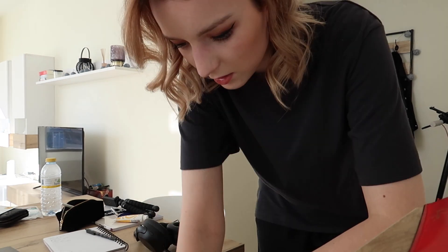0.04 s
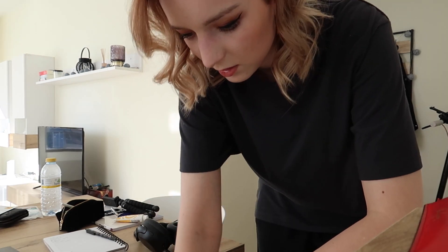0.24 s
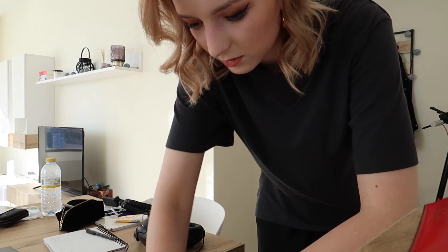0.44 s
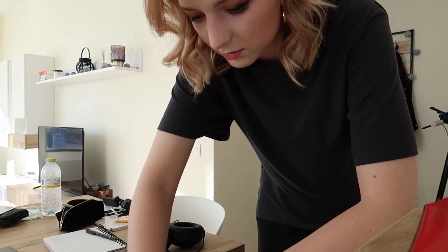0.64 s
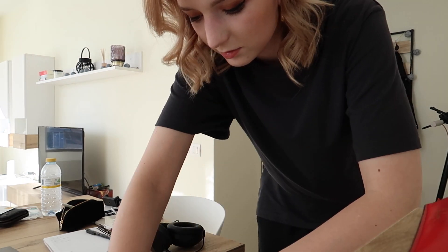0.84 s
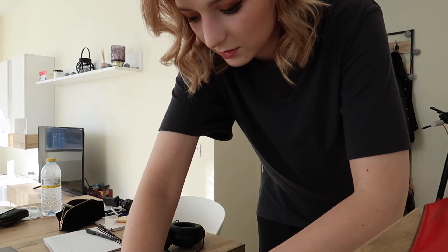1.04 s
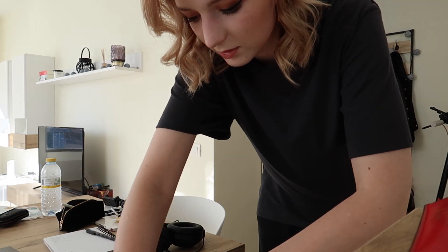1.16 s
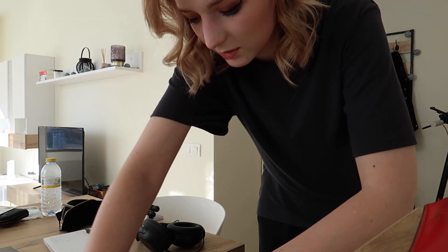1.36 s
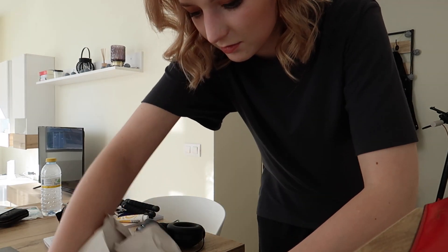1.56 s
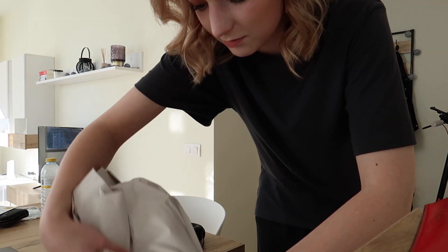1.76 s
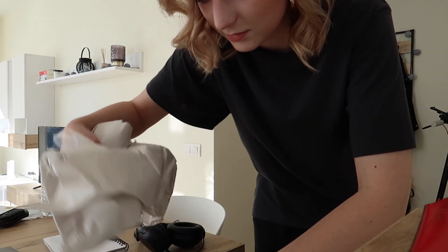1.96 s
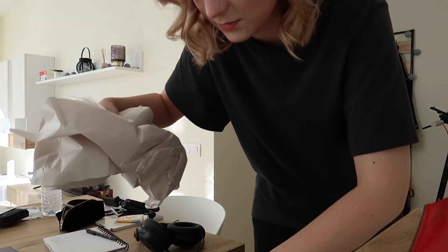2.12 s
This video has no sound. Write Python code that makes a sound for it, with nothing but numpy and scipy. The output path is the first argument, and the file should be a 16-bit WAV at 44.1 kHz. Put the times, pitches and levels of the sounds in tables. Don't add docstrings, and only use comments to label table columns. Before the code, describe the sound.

Packing paper crumples, close and crisp, in a small quiet room. A faint rustle starts, then from about 0.2 s creases crackle in clumps with dull low knocks on the bag wall. It thins near 1 s; a hard bright snap hits at 1.05 s with brief crackle. Denser, sharper crumpling returns from 1.2 to 1.8 s, then fades to sparse ticks and a last fold near 2.2 s over faint air hiss.

```python
import sys
import numpy as np
from scipy import signal
from scipy.io import wavfile

SR = 44100
rng = np.random.default_rng(int(sys.argv[2]) if len(sys.argv) > 2 else 0)


def invert_db(x):
    u = np.asarray(x, float) / 20
    return 10 ** u


def wav_out(sig):
    wavfile.write(sys.argv[1], SR, np.round(np.clip(np.atleast_2d(sig).T, -1, 1) * 32767).astype(np.int16))


N = 96534


def evened(x):
    return x / np.sqrt(np.mean(x ** 2) + 1e-20)


def read(points, hz):
    f, value = np.transpose(points)
    return np.interp(np.log(hz + 1), np.log(f + 1), value)


def add(mix, s, sound):
    part = mix[round(s * SR):][:len(sound)]
    part += sound[:len(part)]


def highpass(x, order, hz):
    return signal.sosfilt(signal.butter(order, hz, "high", fs=SR, output="sos"), x)


def colour(x, points):
    log_gain = np.log(invert_db(read(points, abs(np.fft.fftfreq(4096, 1 / SR)))))
    taps = np.fft.ifft(np.exp(np.conj(signal.hilbert(log_gain)))).real
    return signal.oaconvolve(x, taps[:2048])[:len(x)]


def ring(x, hz, width):
    r = np.exp(-np.pi * width / SR)
    turn = 2 * np.pi * hz / SR
    return signal.lfilter([0, r * np.sin(turn)], [1, -2 * r * np.cos(turn), r * r], x)


def knock(x, hz, width):
    return ring(ring(x, hz, width), hz, width) * 2 * np.e * np.pi * width / SR


def clicks(per_s, size_db, count):
    hit, big, sign = rng.random((count, 3)).T
    size = invert_db(size_db * np.minimum(-np.log(big + 1e-9), 4.0))
    return (hit < per_s / SR) * np.sign(sign - .5) * size


# time in seconds, effort in dB, brightness in dB per octave,
# contact with the bag in dB.
PULL = [(0, -32, -1, -6), (0.069, -36.5, -2.5, -9), (.15, -33, -5.5, -2.5), (.25, -25, -2.5, -19),
        (.37, -29, -2, -13), (.47, -27, -1.55, -13), (.69, -24.5, -0.5, -4.5), (.75, -30.5, 0.1, -1.5),
        (.95, -30.5, -0.5, -7.5), (1.15, -31.5, 0.5, -11), (1.355, -30, -0.5, -10),
        (1.375, -27, -0.3, -12.5), (1.52, -25.5, -0.2, 0), (1.619, -24.5, 2, -7), (1.742, -31, -2.5, -10),
        (1.841, -29.5, 2.5, -10), (1.949, -37, .5, -9), (2.12, -43.5, -2, -2)]


def pull(column):
    rows = np.array(PULL)
    return np.interp(np.arange(N) / SR, rows[:, 0], rows[:, column])


def clumps():
    clump_db, clump_s = 1.5, 0.023
    window = np.hanning(400) ** (1 / (clump_s * SR / 200) ** 2)
    lumps = signal.oaconvolve(rng.standard_normal(N), window, "same")
    return invert_db(clump_db * evened(lumps))


# frequency in Hz, level in dB.
PAPER_COLOUR = [(300, -2.5), (600, -2), (1400, 1), (2500, 2.5), (4100, -5), (8000, -21.5), (11000, -29),
                (14500, -33.5)]


def creases():
    creases_per_s, size_db, slide_db, turns = 3500, 1.5, -2, 3.32
    facets = np.geomspace(420, 15000, num=24)
    train = clicks(creases_per_s, size_db, count=N)
    which = rng.integers(0, len(facets), N)
    slide = invert_db(slide_db) * rng.standard_normal((N, len(facets))).T
    tilt = np.clip(pull(2), -3, 3)
    out = np.zeros(N)
    for k, hz in enumerate(facets):
        drive = evened(train * (which == k)) + slide[k]
        level = invert_db(read(PAPER_COLOUR, hz) + tilt * np.log2(hz / 2000))
        out += np.sqrt(hz) * level * evened(knock(drive, hz, hz / turns))
    return invert_db(pull(1)) * clumps() * evened(out)


def sheet(x):
    unit = abs(colour(np.eye(1, 2048)[0], PAPER_COLOUR)).max()
    return colour(highpass(x, 2, 320), PAPER_COLOUR) / unit


# start in seconds, peak in dB, pitch in
# Hz, length in seconds.
FOLDS = [(0.147, -23, 3280, 0.023), (0.164, -20, 1390, 0.051), (0.214, -20, 1510, 0.0041),
         (0.257, -17, 1550, 0.012), (0.299, -19.5, 1900, 0.011), (0.43, -23, 1520, 0.018),
         (0.47, -21, 1520, 0.0072), (0.582, -25, 3000, 0.0095), (0.693, -14, 2370, 0.0083),
         (0.713, -16.5, 2220, 0.0085), (0.781, -17, 2200, 0.0067), (0.782, -11.5, 2280, 0.012),
         (0.822, -16.5, 2400, 0.019), (0.857, -12, 2450, 0.021), (0.865, -19, 2680, 0.013),
         (1.19, -24, 1460, 0.01), (1.263, -15.5, 2210, 0.016), (1.349, -28, 1980, 0.0042),
         (1.372, -9.5, 2380, 0.016), (1.422, -13, 1740, 0.028), (1.477, -17, 2450, 0.016),
         (1.558, -20, 1370, 0.0021), (1.563, -4.5, 2600, 0.0026), (1.612, -11, 1500, 0.021),
         (1.645, -25, 1480, 0.01), (1.683, -16, 2390, 0.011), (1.795, -10.5, 3520, 0.0031),
         (1.822, -16, 2900, 0.016), (2.1366, -30, 1870, 0.0035), (2.163, -18.5, 3020, 0.0056),
         (2.1873, -7.5, 2800, 0.0019)]


def folds():
    fold_db, wide_db, turns, rise_s = -11, 17, 5.1, .002
    facet, wide, t = np.zeros(N), np.zeros(N), np.arange(2500) / SR
    for s, db, hz, length in FOLDS:
        volley = clicks(3500, 1.3, count=len(t)) * np.minimum(t / rise_s + 0.12, 1)
        volley[4] = 0.45
        volley = invert_db(db + fold_db) * volley * np.exp(-(t / max(length, .001)) ** 2) / 4.2
        add(facet, s, knock(volley, hz, hz / turns))
        add(wide, s, volley)
    return facet + invert_db(wide_db) * sheet(wide)


# start in seconds, peak in dB, pitch in Hz.
TICKS = [(0.0204, -22.5, 2460), (0.0984, -17, 3000), (0.1223, -25, 1530), (0.1263, -33, 1570),
         (0.1368, -18, 2180), (0.1497, -14.5, 3140), (0.1675, -20, 2950), (0.184, -8, 2020),
         (0.1935, -15, 2400), (0.2195, -15, 1590), (0.2343, -12, 1790), (0.2583, -11, 1320),
         (0.2627, -6, 1420), (0.2969, -17, 2000), (0.3133, -6.5, 2350), (0.3234, -12, 1420),
         (0.3421, -29, 2370), (0.4105, -14, 1490), (0.4224, -13, 1690), (0.4343, -12, 3270),
         (0.4402, -9.5, 1500), (0.4543, -10, 2580), (0.4739, -14, 1550), (0.4818, -15, 1480),
         (0.4925, -11, 2180), (0.5168, -20, 1530), (0.5231, -19, 2110), (0.5427, -14, 2120),
         (0.5476, -14, 2160), (0.561, -28, 2240), (0.578, -20, 1435), (0.5834, -8, 880),
         (0.6272, -19, 1510), (0.6418, -11, 1780), (0.6851, -22, 3280), (0.7192, -16, 2090),
         (0.7408, -12, 2370), (0.7498, -18, 1490), (0.7752, -23, 2310), (0.7808, -14, 1610),
         (0.7856, -12, 2370), (0.7911, -18, 1960), (0.8144, -12, 1380), (0.8263, -12, 3640),
         (0.8316, -19, 2200), (0.8537, -12, 2450), (0.8604, -5.5, 1480), (0.8654, -18, 2130),
         (0.8889, -10, 2550), (0.9132, -6.5, 2120), (0.9211, -15, 2030), (0.9262, -29, 1720),
         (0.9602, -25, 1560), (0.9716, -6, 2530), (0.984, -12, 1740), (1.0166, -17, 1370),
         (1.0332, -12, 1750), (1.0408, -30, 1560),
         (1.1068, -15, 3480), (1.1151, -18, 4170), (1.1792, -25, 2770), (1.2013, -8.5, 1490),
              (1.2071, -15, 1310), (1.213, -19, 1480), (1.228, -18, 2130), (1.2406, -7, 2650),
              (1.2486, -21, 2370), (1.2652, -17.5, 1320), (1.2688, -13, 2690), (1.2738, -13, 2060),
              (1.2767, -15.5, 2560), (1.31, -18, 2280), (1.3173, -15, 2310), (1.341, -11, 3300),
              (1.371, -4.5, 3150), (1.3793, -11, 1470), (1.4284, -0.5, 2170), (1.436, -15, 2480),
              (1.4542, -16, 1870), (1.4777, -10, 1920), (1.4843, -13, 2200), (1.487, -10, 2300),
              (1.4992, -10, 990), (1.5142, -23, 1580), (1.5338, -18, 1500), (1.5388, -19, 2520),
              (1.55, -9, 1470), (1.5557, -14, 2070), (1.5628, -6, 1400), (1.571, -19, 2860),
              (1.6118, -4.5, 1310), (1.6175, -11, 1260), (1.6254, -2.5, 2420), (1.6516, -11, 1410),
              (1.678, -7, 2460), (1.6871, -21, 2250), (1.717, -5.5, 2340), (1.765, -17, 2150),
              (1.7925, -20, 2540), (1.8147, -18, 3340), (1.8222, -12, 1580), (1.8285, -9.5, 3530),
              (1.8357, -29, 2610), (1.8586, -9.5, 3000), (1.8733, -16, 1400), (1.8804, -39, 1790),
              (1.9096, -20, 2090), (1.928, -32, 1920), (1.9691, -19, 2050), (1.9784, -30, 2370),
              (2.013, -31, 3060), (2.02, -15.5, 3080), (2.026, -35, 1540), (2.077, -25, 1970),
              (2.1122, -41, 2500), (2.137, -16, 2150), (2.1647, -26, 2700), (2.1685, -21, 1500)]


def ticks():
    tick_db, sheet_db, after, length_s, turns = -9.5, 1.5, 0.39, .0016, 3.2
    facet, wide, t = np.zeros(N), np.zeros(N), np.arange(600) / SR
    for s, db, hz in TICKS:
        volley = after * clicks(3500, 1.6, count=len(t)) * np.exp(-(t / length_s) ** 2)
        volley[0] = rng.choice([-1., 1.])
        volley *= invert_db(db + tick_db)
        add(facet, s, knock(volley, hz, hz / turns))
        add(wide, s, invert_db(sheet_db) * volley)
    return facet + sheet(wide)


# start in seconds, peak in dB.
SNAPS = [
    (1.0534, -3.5),
    (1.0609, -17),
    (1.0672, -21),
    (1.0704, -19),
    (1.0722, -22),
]
# pitch in Hz, resonance width in Hz, level in dB.
SNAP_MODES = [(1400, 250, -17), (1990, 200, -17), (2800, 130, -16), (3860, 150, -11), (4130, 150, -9),
              (4800, 300, -16), (5900, 520, -17), (7400, 400, -25), (10500, 2500, -22)]


def snaps():
    crack_db, crack_hz, crack_turns = -1.5, 2960, 2.6
    trail_db, trail_s, trail_hz, edge_db = -32.0, .075, 3700, -30.0
    hit, trail, t = np.zeros(N), np.zeros(N), np.arange(8000) / SR
    for s, db in SNAPS:
        add(hit, s, invert_db(np.array([db])))
    soft = np.convolve(hit, np.hanning(7) / 2.5)[:N]
    body = sum(invert_db(db) * ring(soft, hz, width) for hz, width, db in SNAP_MODES)
    crack = invert_db(crack_db) * knock(soft, crack_hz, crack_hz / crack_turns)
    stiff = highpass(body - crack, 2, 1300)
    s, db = SNAPS[0]
    crackle = clicks(3000, 3.5, count=len(t)) * np.exp(-(t / trail_s) ** 2)
    add(trail, s, invert_db(db + trail_db) * crackle)
    edge = invert_db(edge_db) * knock(hit, 14000, 2500)
    return stiff + knock(trail, trail_hz, 1200) + edge


# pitch in Hz, resonance width in Hz, level in dB.
BAG_MODES = [(117, 110, -32), (169, 80, -28), (248, 27, 23), (285, 62.5, 33), (394, 83, 2)]
# start in seconds, peak in dB, pitch in Hz.
KNOCKS = [(0.125, -34, 274), (0.257, -9.5, 266), (0.317, -18, 275), (0.397, -9.5, 291), (0.441, -12.5, 267),
          (0.474, -13, 253), (0.51, -13.5, 280), (0.581, -25, 310), (0.631, -29, 245), (0.671, -12, 230),
          (0.774, -11, 226), (0.857, -10, 285), (0.966, -22, 266), (1.053, -17.5, 249), (1.219, -19.5, 285),
          (1.369, -12.5, 248), (1.435, -39, 240), (1.479, -13, 248), (1.545, -16.5, 210), (1.616, -25, 284),
          (1.713, -43, 242), (1.772, -13.5, 263)]


def bag():
    knock_db, width_hz, rise_s = -6.5, 32.3, 0.0011
    taps = clicks(260, -5.5, count=N) + 0.23 * rng.standard_normal(N)
    wall = sum(invert_db(db) * evened(ring(taps, hz, width)) for hz, width, db in BAG_MODES)
    out = invert_db(pull(1) + pull(3)) * clumps() * evened(wall)
    t = np.arange(3000) / SR
    shape = (1 - np.exp(-t / rise_s)) * np.exp(-np.pi * width_hz * t)
    for s, db, hz in KNOCKS:
        add(out, s, invert_db(db + knock_db) * shape * np.sin(2 * np.pi * hz * t))
    return out


# frequency in Hz, time to fall 60 dB in seconds.
ROOM_DECAY = [(200, 0.48), (2000, 0.25), (8000, 0.46)]


def room(x, start):
    taps = np.zeros(SR // 2)
    at = np.arange(start, len(taps) - 20, 20)
    taps[at + rng.integers(0, 20, len(at))] = rng.choice([-1., 1.], len(at))
    hz, t, z = signal.stft(taps, SR, nperseg=256)
    fade = invert_db(-60 * t / read(ROOM_DECAY, hz)[:, None])
    tail = signal.istft(z * fade, SR, nperseg=256)[1]
    return signal.fftconvolve(x, tail / np.linalg.norm(tail))[:N]


# frequency in Hz, level in dB.
AIR_COLOUR = [(20, 8), (45, -10), (110, 10), (300, -3), (1000, -4), (4000, 9), (10000, -47), (15000, -30)]


def air():
    return invert_db(-48.5) * evened(colour(rng.standard_normal(N), AIR_COLOUR))


# frequency in Hz, side level in dB.
WIDTH = [(60, -27), (300, -27.5), (800, -25.5), (1400, -41.5), (2500, -31.5), (4400, -9), (9000, -1.5),
         (14500, 0.5)]


def scene():
    room_db, wide_room_db = -7.5, 3.5
    dry = creases() + folds() + ticks() + snaps() + bag()
    mid = dry + invert_db(room_db) * room(dry, start=150) + air()
    side = colour(invert_db(wide_room_db) * room(dry, start=10) + air(), WIDTH)
    return np.array([mid + side, mid - side])


def roll_off(x):
    return signal.sosfilt(signal.butter(12, 16000, fs=SR, output="sos"), x)


def record(dry):
    x = highpass(dry, 4, 55)
    x = signal.sosfilt(signal.butter(12, 16300, fs=SR, output="sos"), x)
    return roll_off(x)


dry = scene()
out = record(dry)
wav_out(out)
```